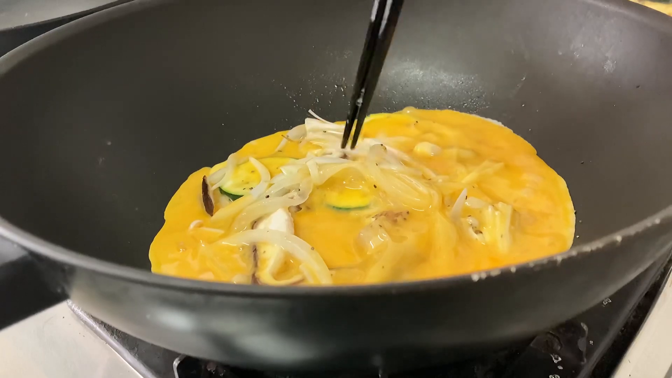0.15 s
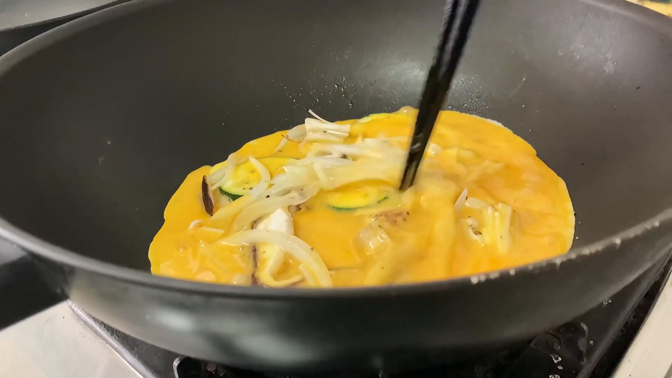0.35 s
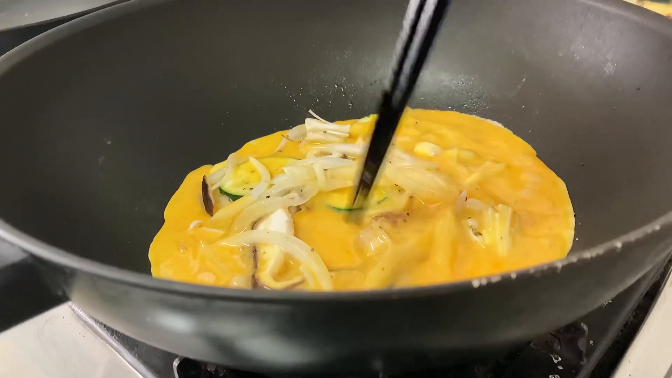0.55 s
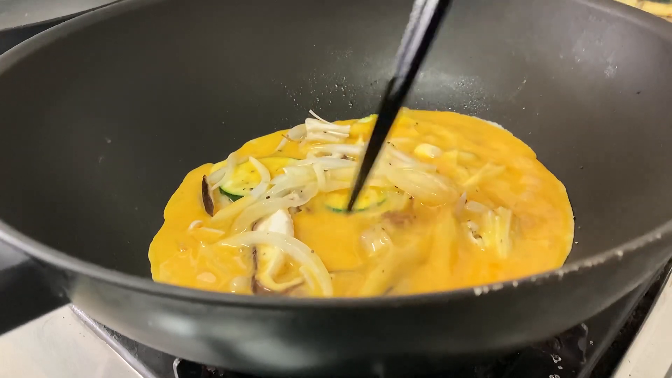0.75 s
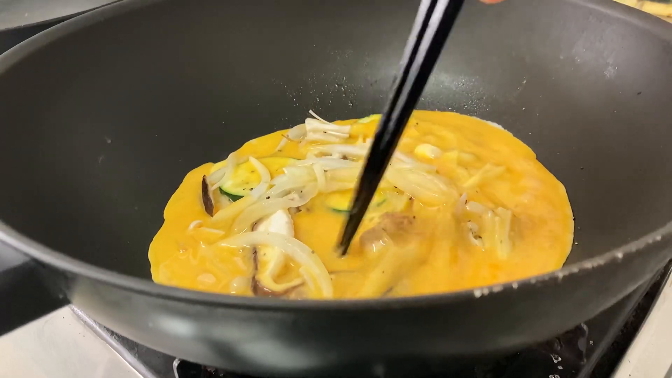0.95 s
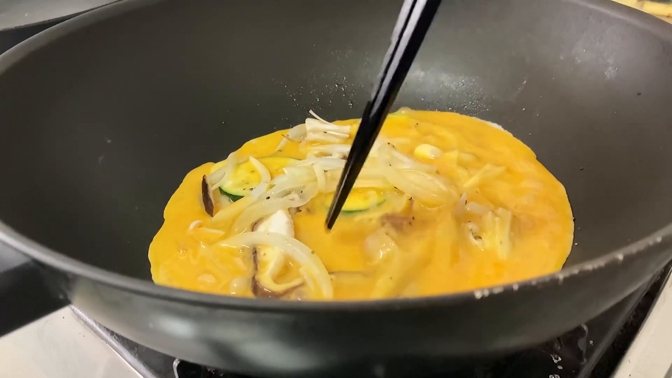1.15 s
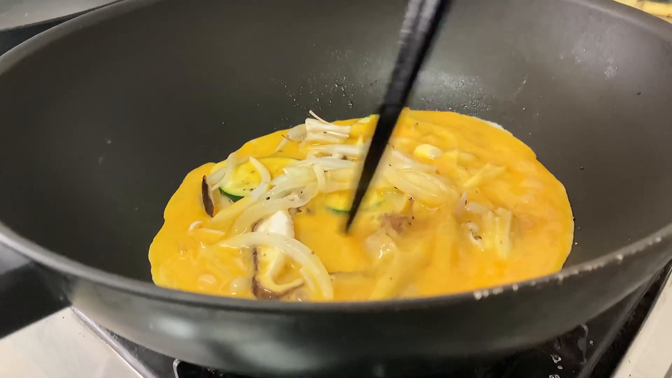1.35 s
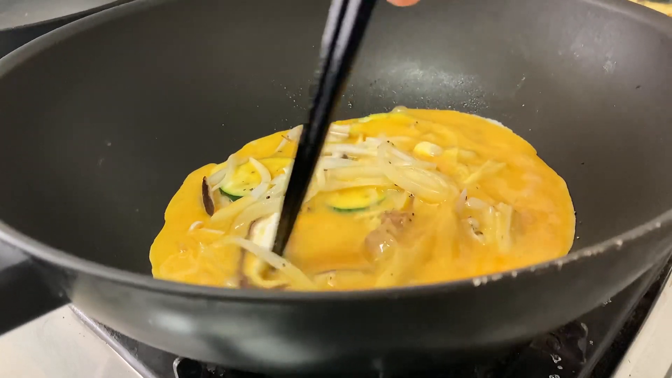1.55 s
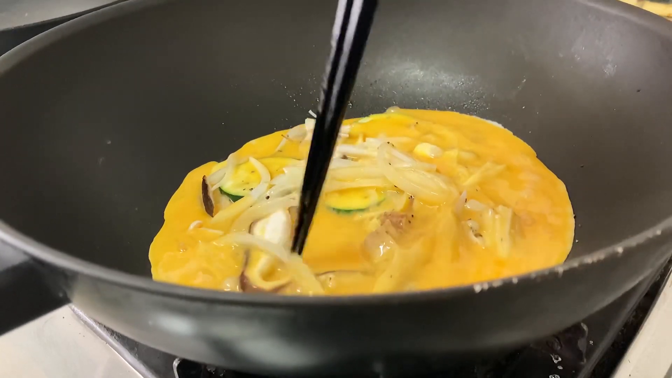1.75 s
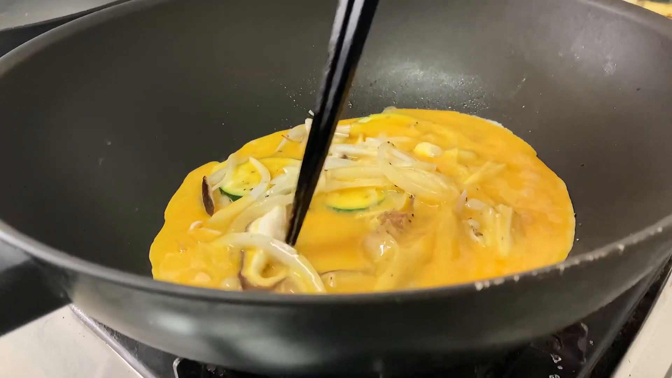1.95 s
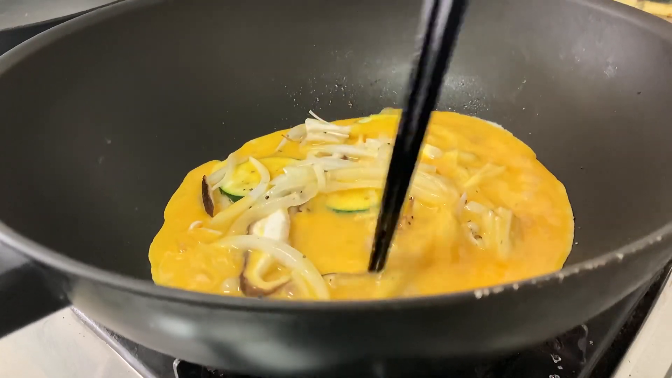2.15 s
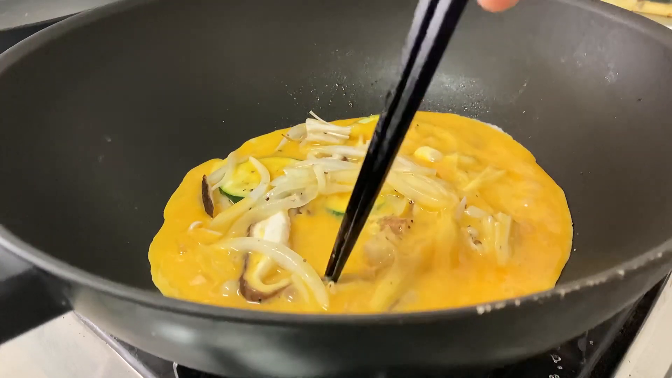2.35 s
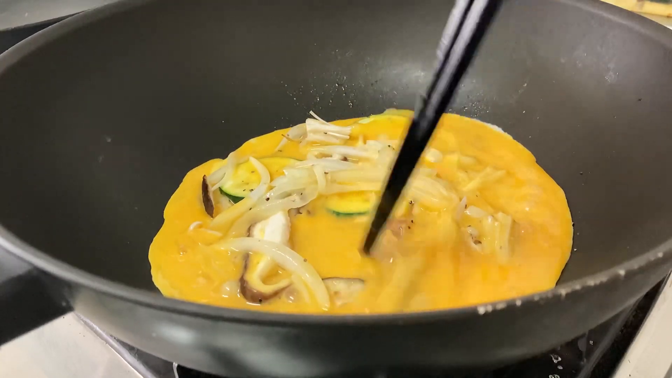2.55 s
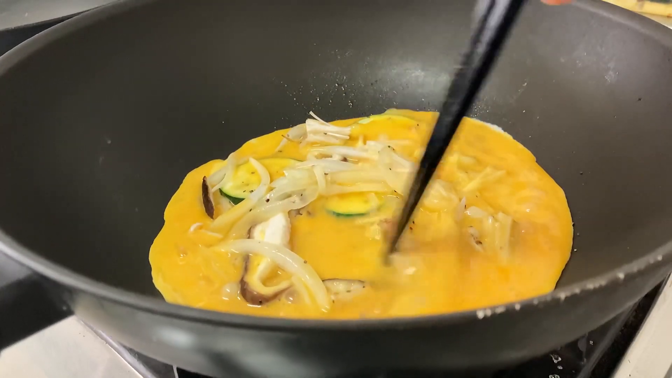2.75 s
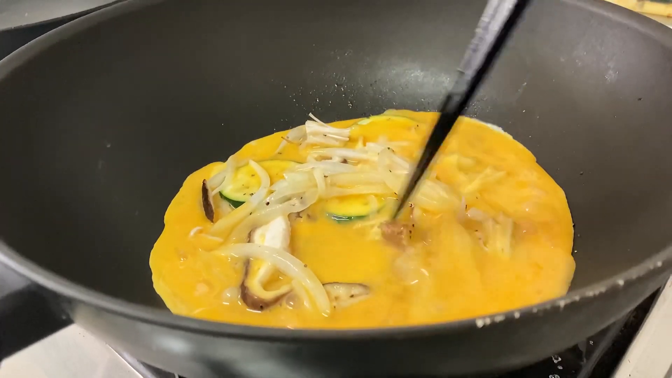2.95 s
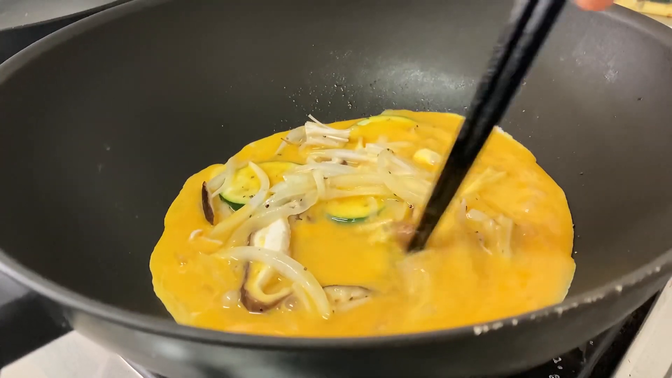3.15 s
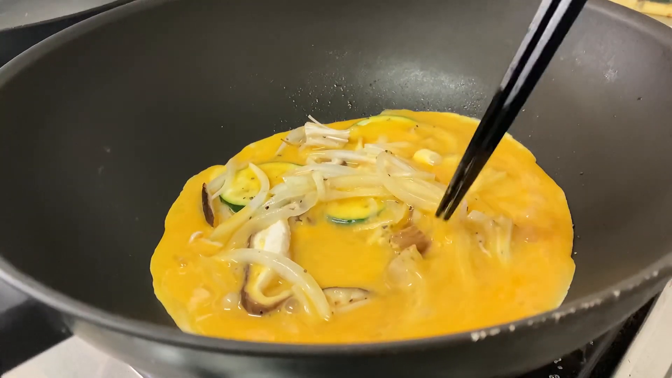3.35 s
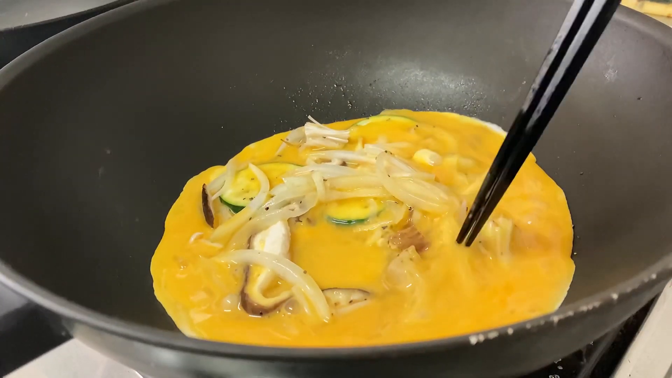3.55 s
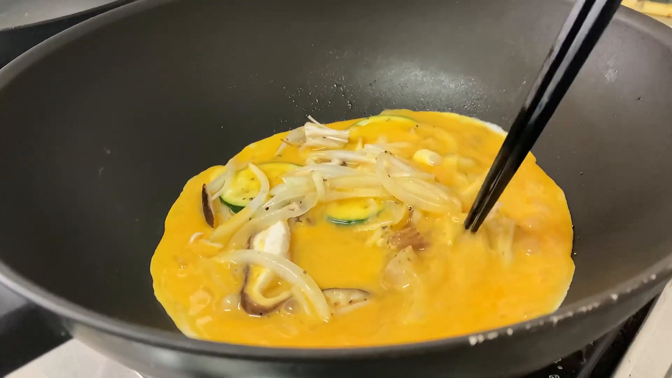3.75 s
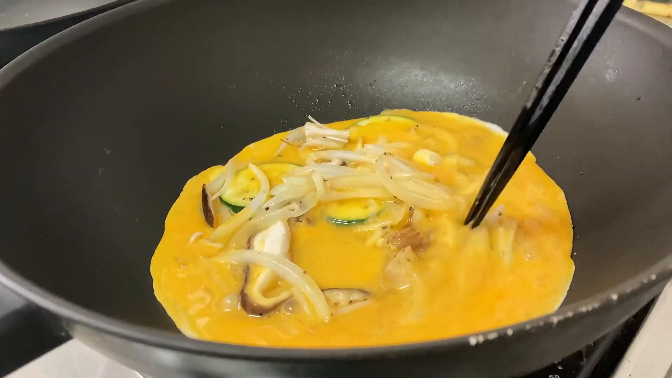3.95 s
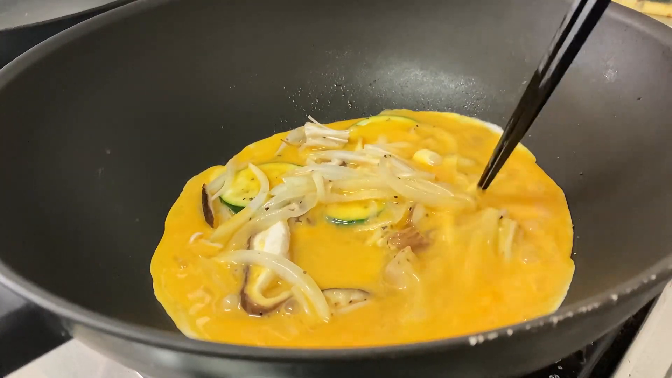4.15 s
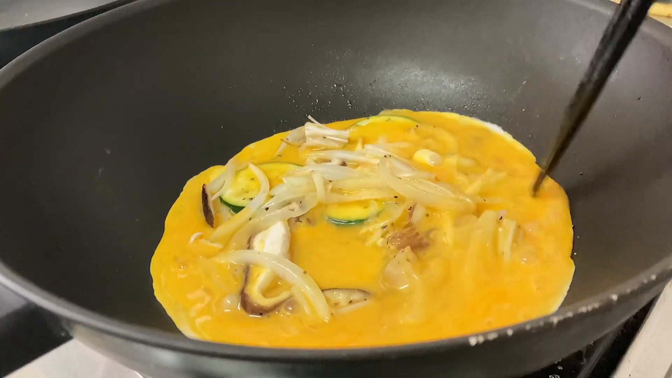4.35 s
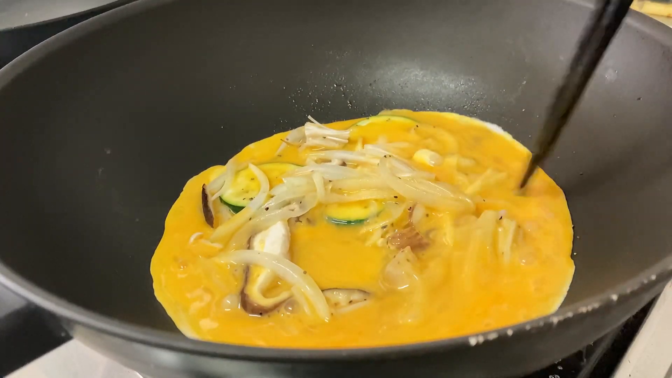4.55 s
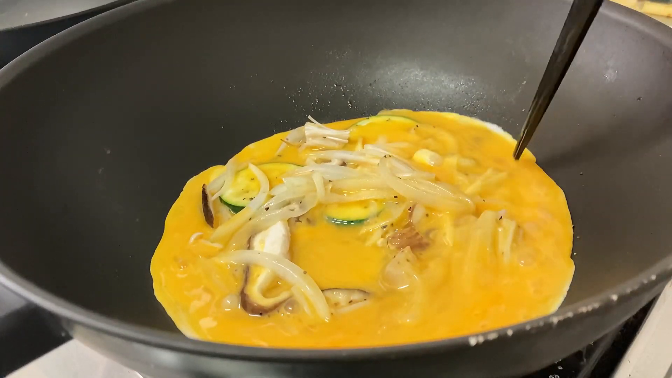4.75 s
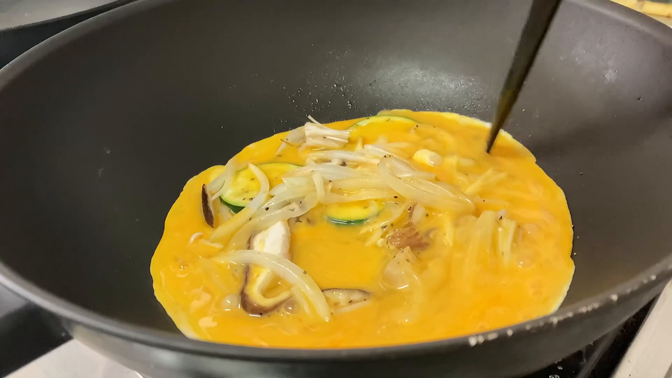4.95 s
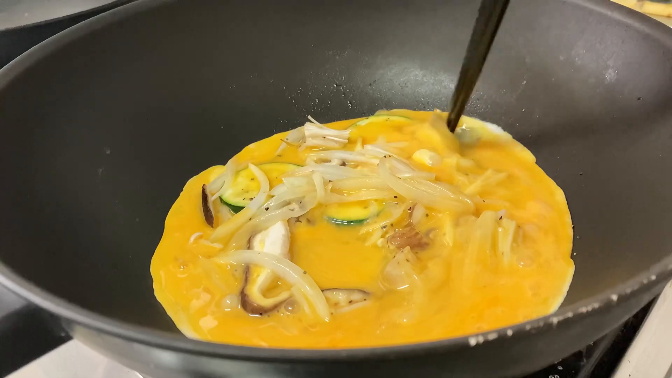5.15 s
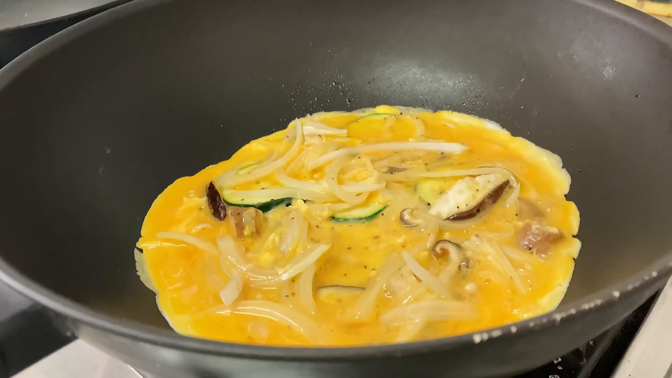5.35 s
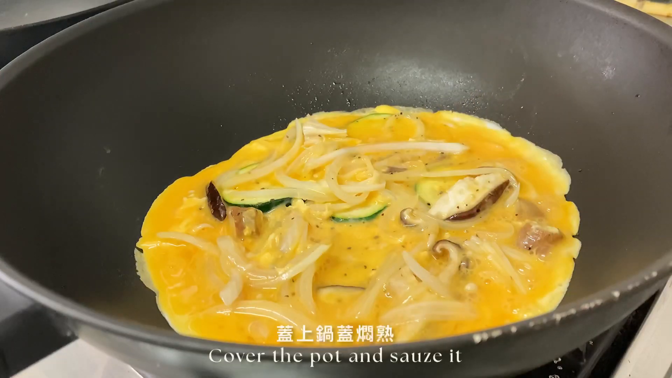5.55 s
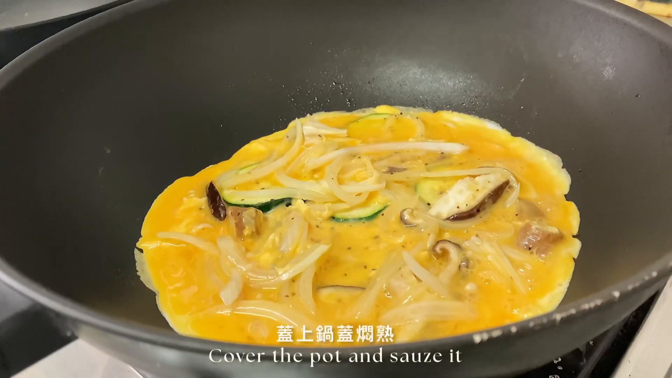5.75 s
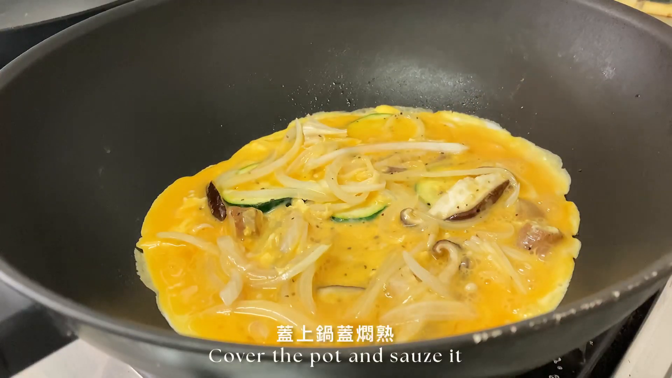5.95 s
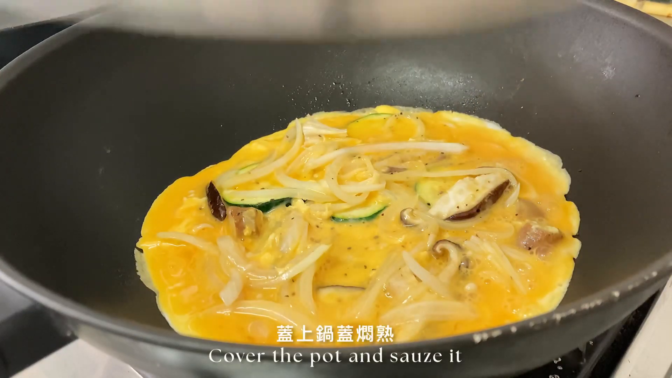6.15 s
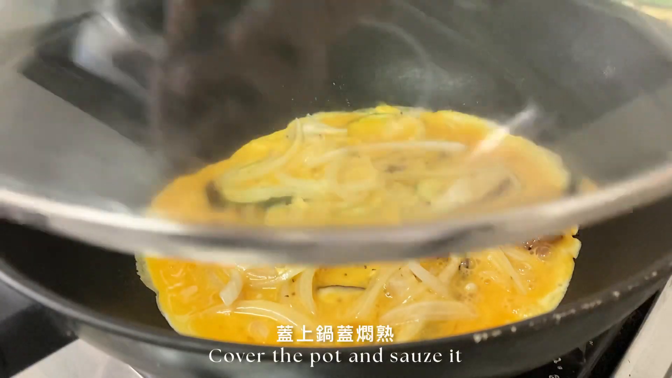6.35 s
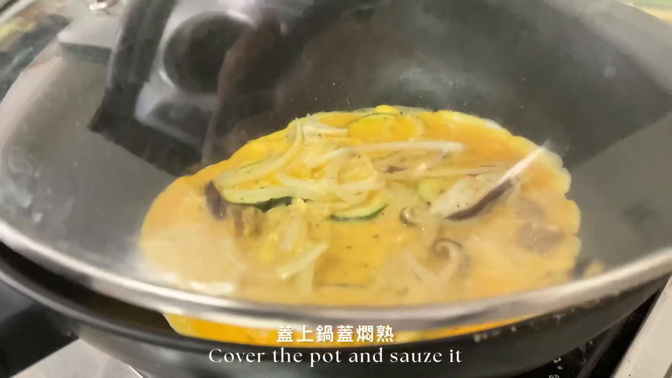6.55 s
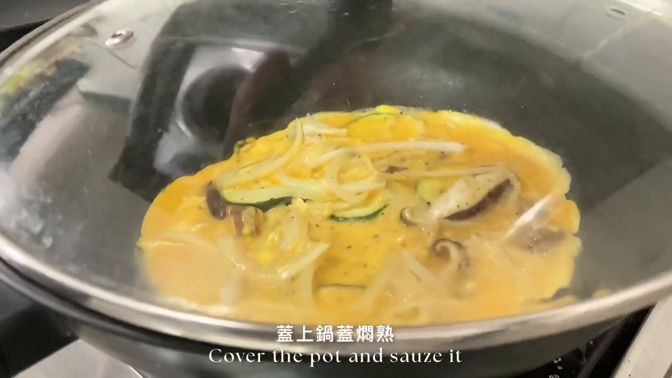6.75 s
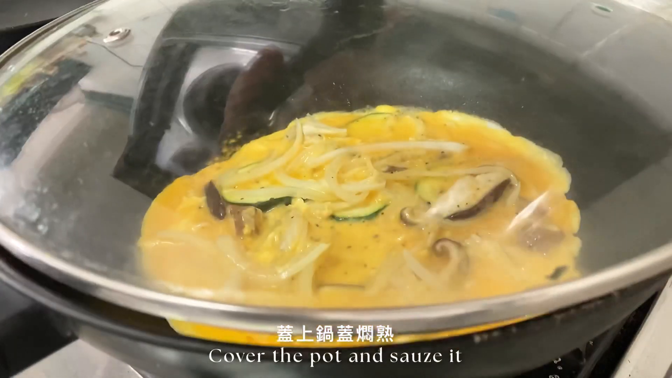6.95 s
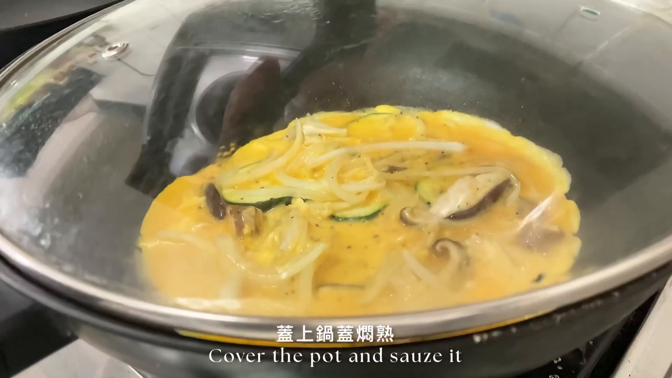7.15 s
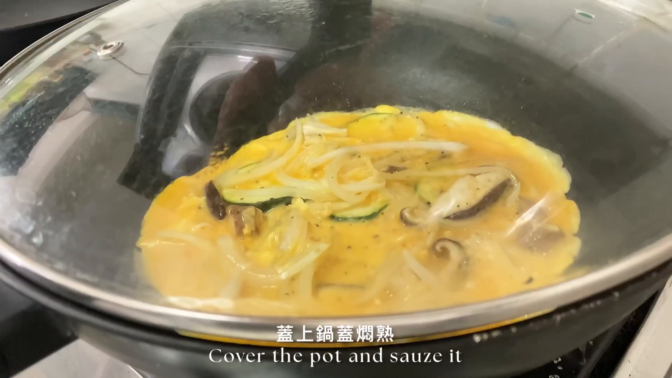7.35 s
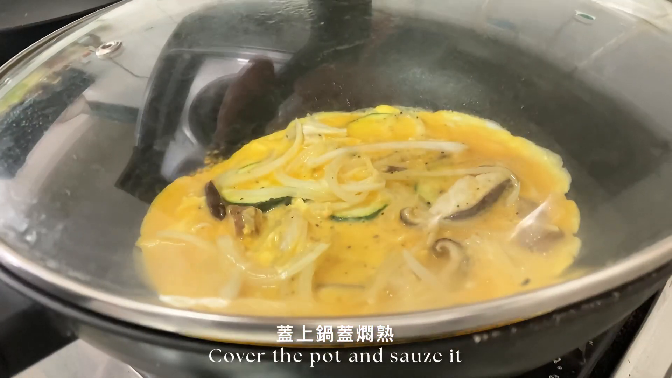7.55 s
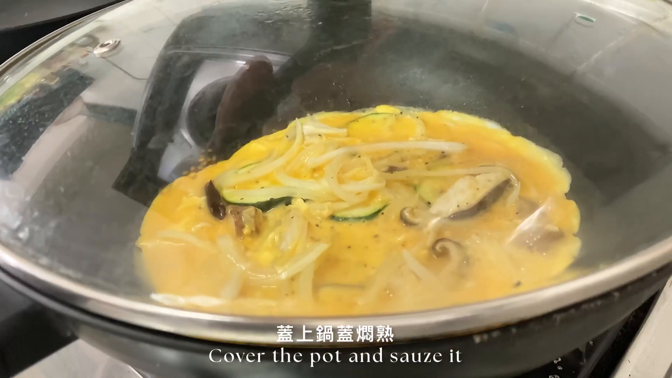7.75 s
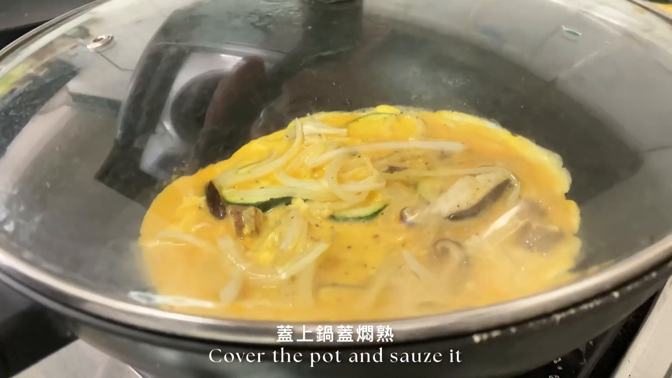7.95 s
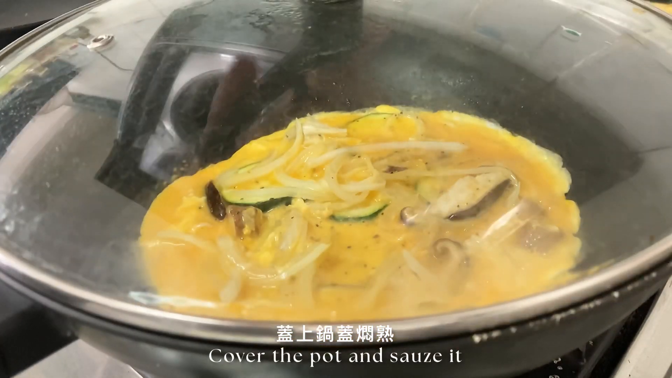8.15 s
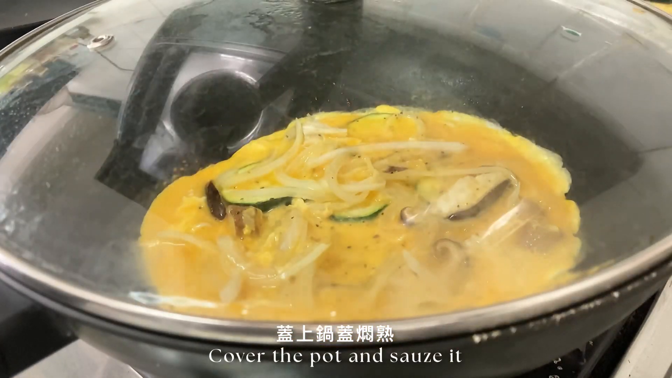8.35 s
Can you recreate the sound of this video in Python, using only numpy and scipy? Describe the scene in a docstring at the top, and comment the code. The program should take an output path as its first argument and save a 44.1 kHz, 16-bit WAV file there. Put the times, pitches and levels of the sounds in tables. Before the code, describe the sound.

Close in a small kitchen, egg and vegetables fry gently: fine fizz, bubbly simmer, wet pops and sharp little fat spits, over a low stove rumble. Chopsticks cause a few dull bumps. Just past five seconds the sizzle dips suddenly and becomes very faint. Then a glass lid with a metal rim knocks loudly, rattles and rocks, and finally drops shut with a ringing clack. Phone microphone, near the pan.

```python
"""Egg and vegetables sizzle gently in a pan: fizz and simmer are shaped noise, with ringing bubbles and spitting fat.
The level dips briefly and a fainter sizzle follows; then a glass lid knocks, rocks on the rim and drops shut,
each contact ringing a set of modes. A faint thin tone starts before the lid knocks and lasts to the end.
The pan shudders after the blows; poking with chopsticks gives dull bumps. Below lie a murmur of the pan and a
rumbling stove; a small kitchen echoes. It is heard close by, through a phone."""
import sys
import numpy as np
from scipy import signal
from scipy.fft import rfft, irfft, next_fast_len
from scipy.io import wavfile
from scipy.ndimage import uniform_filter1d, map_coordinates

SR = 44100
rng = np.random.default_rng(int(sys.argv[2]) if len(sys.argv) > 2 else 0)


def wav_out(sig):
    """Save sig, one row per channel (or a flat mono array), as 16-bit PCM at SR to the path in sys.argv[1]."""
    wavfile.write(sys.argv[1], SR, np.round(np.clip(np.atleast_2d(sig).T, -1, 1) * 32767).astype(np.int16))


N = 374409
DIP_S = 5.234  # the level dips here; the sizzle is fainter afterwards

# how hard the food fries, before the brief dip: t/s, fizz level/dB, simmer level/dB
FRYING = [(0, -53.5, -57), (.62, -53, -58.5), (1.25, -55.5, -60.5), (1.8, -57, -61), (2.5, -57.5, -61),
          (3.1, -56.5, -59), (4.0, -57, -61.5), (5.0, -56.5, -61), (5.1, -58, -58.5), (5.233, -55.5, -58),
          (5.24, -61, -57), (5.275, -64, -54), (5.31, -65, -59.5), (5.36, -66, -63), (5.42, -74.5, -66.5),
          (5.53, -76.5, -74.5), (5.79, -73, -70), (6.04, -76, -75.5), (6.27, -72.5, -75.5),
          (6.44, -78, -79.5), (7.0, -78, -78), (7.41, -82, -83), (7.51, -84, -88), (7.54, -78, -78),
          (7.62, -74, -76), (7.7, -82, -80.5), (7.83, -81.5, -80.5), (7.85, -69, -73), (8.49, -85.5, -85)]
# colour of the steam bubbling under the egg: f/Hz, relative level/dB
SIMMER_COLOUR = [(500, -29), (800, -19.5), (1020, 1.5), (1130, -4.5), (1260, 1.5), (1450, -5), (1900, -2.5),
                 (2300, -5.5), (2700, -5.5), (3200, -11), (3600, -7), (6000, -23.5)]
# colour of the fizz until the dip: f/Hz, relative level/dB
EARLY_FIZZ_COLOUR = [(1500, -21), (3000, -9), (3300, -15), (3650, -6.5), (4000, -10), (4400, -2.5),
                     (5500, -0.5), (6100, 1), (6600, 0.5), (7000, 3.5), (7350, 3), (8000, 2), (9500, 5),
                     (11500, -0.5), (13500, -2), (15600, -4.5)]
# colour of the fizz from the dip on: f/Hz, relative level/dB
LATE_FIZZ_COLOUR = [(1500, -41.5), (3000, -2.5), (4400, 0), (7000, -1), (9500, 1), (11500, -7),
                    (13500, -6.5), (15600, -14)]


def sizzle():
    """Steam bubbles under the egg, and water boiling off in the fat makes a fine fizz: both are patchy noise."""
    fizz_db, simmer_db = curves(FRYING)
    simmer_gain = amp(simmer_db + 1.7 * wobble(45))
    simmer = simmer_gain * rush(SIMMER_COLOUR, grainy=0.19, per_second=270, spread_db=2.5)
    early = rush(EARLY_FIZZ_COLOUR, grainy=0.2, per_second=900, spread_db=5.0)
    late = rush(LATE_FIZZ_COLOUR, grainy=0.15, per_second=530, spread_db=2.0)
    fizz_gain = amp(fizz_db + 0.34 * wobble(40) + 0.43 * wobble(14))
    fizz = fizz_gain * np.where(after_dip(1) > 0, late, early)
    return patchy(simmer, depth_db=1.5) + patchy(fizz, depth_db=2.0)


# the clearest steam bubbles bursting in the egg: t/s, starting level/dB of the lowest tone, its pitch f/Hz
CLEAR_POPS = [(0.3287, -52, 1010), (0.6392, -44, 1310), (0.9226, -47, 1310), (1.1634, -42.5, 1620),
              (1.46, -46, 1030), (2.017, -41.5, 1240), (2.2178, -49, 1300), (2.3673, -42.5, 2180),
              (2.6943, -43.5, 1240), (2.6935, -38, 1760), (2.571, -48, 2120), (2.762, -48, 1290),
              (2.976, -46, 1300), (3.284, -45, 2200), (2.8653, -48, 982), (2.9876, -46, 2120),
              (3.0649, -54, 1060), (3.235, -50, 1200), (3.5214, -46, 2700), (3.6681, -48, 2160),
              (4.3395, -49, 1260), (4.8404, -75, 1930), (0.7746, -48, 1270), (0.02, -46, 1200),
              (0.345, -47, 1250), (0.68, -49, 1150), (0.947, -54, 1010), (1.492, -54, 1050),
              (1.7429, -46, 1280), (1.9599, -50, 1250), (2.6349, -59, 1060), (3.0124, -44.5, 1250),
              (3.1541, -44, 2570), (3.1965, -43, 1640), (3.2546, -47, 2150), (3.2735, -48, 1230),
              (4.083, -46, 2950), (4.9706, -40, 1600), (0.426, -47, 1500), (1.228, -47, 1150),
              (1.335, -53, 1200)]
SMALL_POPS_PER_S, SMALL_POP_DB, SMALL_POP_HZ = 34, -56, 1400  # rate, mean level, middle pitch
POP_CYCLES = 17  # cycles of the lowest tone while it falls by 60 dB
TEAR_GAIN = 0.632  # of the smoothed noise, against the lowest tone


def pops():
    """Each bubble rings a few cycles with weaker overtones, and its skin tears with a wet click, across the pan."""
    s, (size, pitch, _) = scattered(SMALL_POPS_PER_S, count=320)
    small = np.transpose([s, SMALL_POP_DB + 4.8 * size, SMALL_POP_HZ * np.exp(0.3 * pitch)])
    s, db, hz = np.vstack([CLEAR_POPS, small]).T[:, :, None]
    turns = hz * np.arange(SR // 50) / SR  # cycles since the start
    tones = np.sin(2 * np.pi * turns)
    tones += 0.51 * np.sin(2 * np.pi * 1.805 * turns)
    tones += 0.5 * amp(-9 * turns) * np.sin(2 * np.pi * 2.8 * turns)
    ring = amp(db - 60 * turns / POP_CYCLES) * tones
    tear = uniform_filter1d(rng.standard_normal(turns.shape), size=7, axis=1) * amp(-14 * turns)
    pop = ring + amp(db) * TEAR_GAIN * tear
    pan_db = 0.99 + 3 * rng.standard_normal(s.shape)  # left over right
    return np.array([placed(s[:, 0], amp(side * pan_db / 2) * pop) for side in (1, -1)])


# chosen spits and small ticks: t/s, peak level/dB of the thin snap, body level/dB against that snap
CHOSEN_SPITS = [(0.1491, -33, -13), (0.1745, -30.5, -23), (0.4259, -37, 3), (0.5544, -37, -9),
                (0.9223, -35, -1), (1.076, -31, -1), (1.2296, -38, 3), (1.7484, -34, -6), (1.8472, -37, -3),
                (1.8956, -30.5, -15), (2.2792, -36.5, -6), (2.6783, -32.5, -7), (2.7526, -34, -6),
                (2.8943, -39, -5), (3.0784, -38, -5), (3.1522, -38.5, 12.5), (3.1757, -40, -12),
                (3.5458, -36, -1), (3.7274, -40, -6), (3.8227, -40, -5), (4.6229, -37.5, -16),
                (5.2314, -44, 2), (6.1764, -61.5, 16), (7.3013, -51, -11), (7.5228, -52, -10),
                (7.5887, -50, -10), (7.657, -52, 3.5), (7.783, -59, -11)]
SMALL_SPITS_PER_S, SMALL_SPIT_DB, SMALL_BODY_DB = 10, -49.5, -2.5  # rate and the two mean levels


def spits():
    """Each spit of fat or tick is a very short snap of noise through broad resonances, thin or with some body."""
    s, (size, fullness, _) = scattered(SMALL_SPITS_PER_S, count=120)
    small = np.transpose([s, SMALL_SPIT_DB + 4 * size, SMALL_BODY_DB + 3 * fullness])
    s, db, body_db = np.vstack([CHOSEN_SPITS, small]).T[:, :, None]
    t = np.arange(1024) / SR
    hz = np.fft.rfftfreq(len(t), 1 / SR)
    snap = rfft(rng.standard_normal((len(s), len(t))) * amp(-60 * t / 0.009))
    bright = resonances([(9900, 7300, 0)], hz) * resonances([(10900, 20000, 0)], hz)
    thin = peak_one(irfft(snap * bright))
    body_hz = 3500 * np.exp(0.22 * rng.standard_normal(s.shape))
    body = peak_one(irfft(snap * resonances([(body_hz, 1.9 * body_hz, 0)], hz)))
    return placed(s[:, 0], amp(db) * (thin + amp(body_db) * body))


# lid touching rim: t/s, push level/dB into the thud, knock, clack and tick modes,
# rattle time/s to fall by 60 dB, favoured knock f/Hz, favoured clack f/Hz
LID_CONTACTS = [(6.598, -3, 12, -18.5, -23.5, 0.041, 427, 1524),
                (6.607, 23.5, 38, 10, -6, 0.052, 442, 2220), (6.624, 20, 11, 0, -24.5, 0.1, 416, 1505),
                (6.641, -7, 0, 5, -18, 0.09, 418, 2125), (6.693, 10, 11, 2, -21.5, .085, 420, 2080),
                (6.775, -11, 22, -2, -56, 0.019, 710, 1080), (6.782, 10.5, 22, 9, -29, 0.087, 395, 2300),
                (6.793, -1, 7, -14, -20, 0.043, 420, 1800), (6.836, 2, 4, -9, -35, .046, 420, 1900),
                (6.897, -5, 11, -18, -29, 0.097, 417, 1950), (6.923, -6, 19, -16, -30, .049, 400, 2400),
                (6.932, 14, 19.5, -16, -26, 0.096, 414, 1000), (6.943, -7, -5, -8.5, -34, 0.026, 420, 2380),
                (6.979, -3, 24, -14, -37, 0.044, 320, 1000), (7.003, 10, -7, -15.5, -45, .05, 320, 2100),
                (7.051, 0, -13, -36, -62, 0.024, 395, 2050), (7.094, 0, -14.5, -49, -33.5, .02, 297, 3470),
                (7.19, 23.5, 14.5, -7.5, -46, 0.05, 561, 1010),
                (7.194, -7.5, -7, -17, -58, 0.026, 560, 1900), (7.209, 21, -21, -16, -50, .034, 300, 1900),
                (7.288, 7, -11, -40, -43.5, .06, 380, 2260), (7.345, -7, -19, -35, -44, .03, 300, 1260),
                (7.569, -12.5, -10.5, -33, -54.5, .08, 422, 1260),
                (7.649, -14, -15, -18.5, -50.5, 0.022, 400, 1807),
                (7.846, -4.5, -16, -41.5, -36, .04, 400, 3010),
                (7.865, 9, -7, -35, -26.5, 0.025, 302.4, 3400), (7.876, 20, 7, 2, -29.5, 0.046, 500, 1442),
                (7.888, 35, 36.5, 23.5, 4.5, 0.023, 449, 2107),
                (7.896, 30, 10.5, 3, -12.5, 0.046, 650, 2890), (7.909, 23.5, 0, 8, -25.5, .08, 404, 3110),
                (7.926, 25, -6.5, 7.5, -29, 0.093, 299, 2400), (7.939, 15, 24.5, 7, -29, .04, 800, 1400),
                (7.987, 10.5, 3.5, -18, -35.5, .046, 400, 2100),
                (8.097, 3, -21, -17, -41, 0.085, 462, 1300)]
# ringing modes of lid and pan: f/Hz, width f/Hz, level/dB
LID_MODES = [(49, 19, -9), (81, 41, -6), (112, 33, -0.5), (155.2, 48, 5), (186.4, 61, 3.5), (317, 46, -8.5),
             (352, 40, -7.5), (411, 38.6, 2), (460, 246, -1), (477, 62, -4.5), (553, 28, -21),
             (670, 43, -5.5), (815, 38, -15.5), (973, 55, 5), (1230, 32, -2), (1456, 36, -8),
             (1505, 43, -3.5), (1690, 26, -16.5), (1844, 24, 2.5), (2000, 37, -10.5), (2305, 45, 4.5),
             (2520, 27, -10.5), (2700, 33, -12.5), (2885, 82, -11.5), (3160, 30, -11.5), (3475, 17, -0.5),
             (1900, 5500, -8), (3630, 50, 5.5), (3810, 43, 12), (4040, 30, 3.5), (4200, 22, 14),
             (4900, 40, -3.5), (5270, 55, 15.5), (5800, 60, 8.5), (6060, 50, -5), (5200, 4200, 6.5)]
# limits of the thud, knock, clack and tick groups: f/Hz
MODE_GROUP_LIMITS = [0, 280, 900, 3500, 20000]
# knock, then clack: reach of the favoured pitch as a share of it, gain far from it
PITCH_FAVOUR = [(.4, 0.25), (.5, 0.46)]
RATTLE_RISE_S = 0.0012
BLOW_LAG_S = 0.001038  # the full weight lands just after the edge first touches
MODE_DRIFT = 0.0021  # chance in the pitch of each clear ring, as a share
RING_RATTLE_SHARE = 0.45  # the clear rings follow mostly the blow
LATE_CONTACT_S, LATE_RING_DB = 7.88, -4  # level of the clear rings for contacts after this time


def lid():
    """A blow and a short rattle drive the same modes at every contact; where it lands favours some of them."""
    out, t = np.zeros(N + SR), np.arange(2 ** 14) / SR
    hz = np.fft.rfftfreq(len(t), 1 / SR)
    modes = np.array(LID_MODES, dtype=float)
    centre_hz, width_hz = modes[:, 0], modes[:, 1]
    group = np.digitize(centre_hz, MODE_GROUP_LIMITS) - 1
    clear = (centre_hz > MODE_GROUP_LIMITS[2]) & (width_hz < centre_hz / 10)  # the narrow high rings
    # the low modes follow the blow, the broad high ones the rattle
    rattle_share = np.array([[0.12], [0.25], [0.8], [0.85]])
    # a padded contact passes little above the modes that it drives
    soft_hz = np.array([[600], [1800], [6000], [9500]])
    edges = (1j * hz / (25 + 1j * hz)) ** 2 / (1 + 1j * hz / soft_hz) ** 4
    blow = rfft(np.arange(len(t)) == round(BLOW_LAG_S * SR))

    def push(share, rattle):
        return share * rattle + (1 - share) * blow

    def answer(tuned, chosen):
        return np.array([resonances(tuned[chosen & (group == k)], hz) + 0 * hz for k in range(4)])

    for s, thud_db, knock_db, clack_db, tick_db, t60, knock_hz, clack_hz in LID_CONTACTS:
        rattle = rng.standard_normal(len(t)) * amp(-60 * t / t60) * (1 - np.exp(-t / RATTLE_RISE_S))
        rattle = rfft(rattle / np.linalg.norm(rattle))
        tuned = modes.copy()
        tuned[:, 0] *= 1 + MODE_DRIFT * clear * rng.standard_normal(len(modes))
        body = push(rattle_share, rattle) * answer(tuned, ~clear)
        ring_gain = amp(LATE_RING_DB * (s > LATE_CONTACT_S))
        body = body + ring_gain * push(RING_RATTLE_SHARE, rattle) * answer(tuned, clear)
        for k, favoured_hz, (reach, floor) in zip((1, 2), (knock_hz, clack_hz), PITCH_FAVOUR):
            body[k] *= floor + resonances([(favoured_hz, reach * favoured_hz, 0)], hz)
        sound = amp([[thud_db], [knock_db], [clack_db], [tick_db]]) * body * edges
        out[round(s * SR):][:len(t)] += irfft(sound.sum(axis=0))
    return out[:N]


# steel edge on steel rim: t/s, peak level/dB, centre f/Hz
RIM_CRACKS = [(6.6073, -22, 9050), (7.8882, -20, 4750)]
CRACK_T60_S = 0.02  # time for the noise to fall by 60 dB


def edge_cracks():
    """The two hard landings begin with a bright crack: a short noise burst through a broad resonance."""
    s, db, centre_hz = np.transpose(RIM_CRACKS)[:, :, None]
    t = np.arange(1024) / SR
    hz = np.fft.rfftfreq(len(t), 1 / SR)
    burst = rfft(rng.standard_normal((len(s), len(t))) * amp(-60 * t / CRACK_T60_S))
    crack = irfft(burst * resonances([(centre_hz, 1.1 * centre_hz, 0)], hz) ** 3)
    return placed(s[:, 0], amp(db) * peak_one(crack))


# the pan shudders on its stand after the lid strikes, levels before the soft rise and, for the ring,
# before its channels are averaged: t/s, broad noise level/dB, hollow ring level/dB, time/s to fall by 60 dB
PAN_SHUDDERS = [(6.62, -38, -37.5, 0.97), (6.77, -46, -43, 1), (6.93, -56, -47.5, 0.8),
                (7.2, -49, -68, 0.53), (7.941, -39.5, -49, 0.84), (8.1, -49, -49, 0.34)]
# colour of the broad noise: f/Hz, relative level/dB
SHUDDER_COLOUR = [(24, -46.5), (40, 2), (130, 1.5), (281, -2), (432, -22), (711, -11.5), (853, -16.5),
                  (1800, -28), (4360, -38.5), (7860, -37.5), (9000, -62.5), (11700, -100.5), (19800, -120)]
# colour of the air between lid and pan: f/Hz, relative level/dB
HOLLOW_COLOUR = [(250, -39.5), (320, 5), (360, 7.5), (390, 5), (415, 9.5), (480, 1), (540, -17.5),
                 (650, -19), (900, -41)]
SHUDDER_RISE_S = 0.029


def shudder():
    """The shaken pan gives rough noise and a hollow ring of air, which rise fast after a blow and die away."""
    s, noise_db, ring_db, t60 = np.transpose(PAN_SHUDDERS)[:, :, None]
    t = np.arange(SR // 2) / SR
    shape = amp(-60 * t / t60) * (1 - np.exp(-t / SHUDDER_RISE_S))

    def level(db):
        return np.sqrt(placed(s[:, 0], (amp(db) * shape) ** 2))  # overlapping shudders add as power

    noise = amp(1.6 * wobble(27)) * rush(SHUDDER_COLOUR, grainy=0.27, per_second=140, spread_db=1.5)
    ring = rush(HOLLOW_COLOUR).mean(axis=0)
    return level(noise_db) * leaning(noise) + level(ring_db) * ring


# dull bumps through the stove top, levels before the soft start:
# t/s, ring level/dB, ring f/Hz, thud level/dB, knock level/dB
STOVE_BUMPS = [(2.256, -60, 99, -76, -41.5), (2.376, -36.5, 180, -47, -47), (2.398, -33, 73, -61, -44),
               (2.431, -36, 92, -64, -49), (2.495, -39, 89, -55, -58), (3.536, -40, 178, -70, -42.5),
               (5.031, -58, 93, -57, -46), (6.159, -39, 97, -48, -52), (6.199, -40, 72, -55, -64.5)]
BUMP_T60_S, THUD_T60_S, KNOCK_T60_S = 0.088, 0.31, 0.07  # times to fall by 60 dB
THUD_HZ, KNOCK_HZ = 48, 403


def bumps():
    """Soft pushes: a short low ring, a deep thud of the counter and a knock of the pan, all dying sines."""
    s, db, hz, thud_db, knock_db = np.transpose(STOVE_BUMPS)[:, :, None]
    t = np.arange(SR // 3) / SR
    ring = amp(db - 60 * t / BUMP_T60_S) * np.sin(2 * np.pi * hz * t)
    thud = amp(thud_db - 60 * t / THUD_T60_S) * np.sin(2 * np.pi * THUD_HZ * t)
    knock = amp(knock_db - 60 * t / KNOCK_T60_S) * np.sin(2 * np.pi * KNOCK_HZ * t)
    soft_start = 1 - np.exp(-t / 0.0064)
    return placed(s[:, 0], (ring + thud + knock) * soft_start)


TONE_FROM_S, TONE_DB, TONE_FADE_DB_PER_S = 5.8, -90, 0.5


def thin_tone():
    """A faint, unsteady whistle: a narrow band of noise that fades slowly."""
    since = np.arange(N) / SR - TONE_FROM_S
    fade_in = np.clip(since / 0.092, 0, 1)
    level = amp(TONE_DB - TONE_FADE_DB_PER_S * since + 3 * wobble(7)) * fade_in
    return level * rush([(4000, -56.0), (4130, 0.0), (4210, -2.5), (4330, -64.5)])


# colour of the pan's murmur: f/Hz, relative level/dB
MURMUR_COLOUR = [(180, -22.5), (260, -9), (400, -3.5), (560, -8.5), (800, -12.5), (1400, -32.5),
                 (2500, -54.5)]
# shared by murmur() and stove(), before the brief dip: t/s, stove rumble level/dB, pan murmur level/dB
STOVE_LEVELS = [(0, -56.5, -61), (1.4, -58, -62.5), (1.8, -58, -64.5), (2.5, -54.5, -61.5),
                (3.0, -58.5, -64), (4.3, -60.5, -64), (4.65, -60.5, -61.5), (5.1, -56, -61),
                (5.3, -65.5, -64), (5.42, -63, -65), (5.55, -58.5, -67.5), (5.8, -56.5, -66),
                (6.15, -61, -69), (6.5, -57, -68), (7.4, -57, -70), (7.64, -56, -69.5), (7.85, -61.5, -72),
                (8.49, -65.5, -74)]


def murmur():
    """The bowl of the pan murmurs: low, slightly grainy noise of unsteady level."""
    gain = amp(curves(STOVE_LEVELS)[1] + 1.8 * wobble(20))
    return gain * rush(MURMUR_COLOUR, grainy=0.067, per_second=40, spread_db=2.0)


# colour of the rumble until the dip: f/Hz, relative level/dB
RUMBLE_EARLY_COLOUR = [(15, -49), (25, -38), (43, -11), (97, 3), (184, -6), (217, -9.5), (300, -17.5),
                       (390, -83), (660, -120)]
# colour it moves to from the dip on: f/Hz, relative level/dB
RUMBLE_LATE_COLOUR = [(15, -53.5), (25, -50), (38, -35), (62, -3.5), (74, 4), (79, 11), (85, -1),
                      (100, -5.5), (162, -12), (234, -12.5), (300, -28.5), (390, -41.5), (660, -120)]


def stove():
    """The stove is a lumpy low noise that changes colour over about half a second from the dip."""
    late = after_dip(0.57)
    drone = np.sqrt(1 - late) * rush(RUMBLE_EARLY_COLOUR) + np.sqrt(late) * rush(RUMBLE_LATE_COLOUR)
    return amp(curves(STOVE_LEVELS)[0] + 0.96 * wobble(14)) * leaning(drone)


# how long the room rings: f/Hz, time/s to fall by 60 dB
KITCHEN_T60 = [(100, 0.76), (300, 0.44), (1000, 0.46), (4000, 0.65), (6500, 0.26), (9000, 0.15),
               (14000, 0.2)]


def kitchen(x):
    """The room answers with a tail of noise in which each frequency dies at its own speed."""
    hz, t, z = signal.stft(rng.standard_normal((2, SR)), SR, nperseg=512)
    decay = amp(-60 * t / along(KITCHEN_T60, hz)[:, None])
    mid, side = signal.istft(z * decay, SR, nperseg=512)[1]
    tail = (mid + 0.58 * np.array([[1], [-1]]) * side) / np.linalg.norm(mid)
    delayed = np.pad(x, (300, 0))  # samples
    return signal.fftconvolve(delayed[None], tail, axes=1)[:, :N]


def amp(db):
    """Gain of a level in dB."""
    return 10 ** (np.asarray(db) / 20)


def unit(x):
    """x at rms 1."""
    return x / np.sqrt(np.mean(x ** 2) + 1e-20)


def peak_one(x):
    """Each row of x with its peak at 1."""
    return x / np.abs(x).max(axis=1, keepdims=True)


def along(points, hz):
    """Values read between (Hz, value) points on a log axis."""
    f, v = np.transpose(points)
    return np.interp(np.log(hz + 1), np.log(f + 1), v)


def curves(rows):
    """One value per sample for each column after the time."""
    s, *cols = np.transpose(rows)
    return [np.interp(np.arange(N) / SR, s, c) for c in cols]


def wobble(rate):
    """A smooth random curve, rate knots a second."""
    knots = rng.standard_normal(int(N * rate / SR) + 4)
    return map_coordinates(knots, [np.arange(N) * rate / SR])


def after_dip(fade_s):
    """0 until the level dips, then rising to 1 over fade_s seconds."""
    return np.clip((np.arange(N) / SR - DIP_S) / fade_s, 0, 1)


def scattered(per_second, count):
    """Random moments before the level dips, and three normal draws for each."""
    times = np.cumsum(rng.exponential(size=count)) / per_second
    draws = rng.standard_normal((count, 3))
    return times[times < DIP_S], draws[times < DIP_S].T


def placed(times, sounds):
    """Each row of sounds laid down at its time."""
    at = np.round(np.asarray(times) * SR).astype(int)[:, None] + np.arange(sounds.shape[1])
    return np.bincount(at.ravel(), sounds.ravel(), N + SR)[:N]


def filtered(x, response):
    """x times a complex response of frequency."""
    m = next_fast_len(N + 8192)
    return irfft(rfft(x, m) * response(np.fft.rfftfreq(m, 1 / SR)), m)[..., :N]


def resonances(modes, hz):
    """Answer of (Hz, width, dB) modes that ring only after the push, with alternating signs."""
    return sum((-1) ** k * amp(db) * 1j * hz * w / (c * c - hz * hz + 1j * hz * w)
               for k, (c, w, db) in enumerate(modes))


def grains(per_second, spread_db):
    """Two unrelated trains of tiny bursts at random moments, a few of them much stronger."""
    fires = rng.random((2, N)) < per_second / SR
    strength = amp(spread_db * np.minimum(rng.exponential(size=(2, N)), 3.5))
    return unit(fires * rng.standard_normal((2, N)) * strength)


# how alike left and right are in the noise: f/Hz, likeness (1 is the same, 0 unrelated)
LIKENESS = [(60, 0.91), (250, 0.9), (700, 0.53), (1300, 0.75), (2000, 0.95), (4000, 0.054), (6000, 0.58)]


def rush(spectrum, grainy=0, per_second=1000, spread_db=3):
    """Stereo noise of rms 1, part smooth and part grains; mixing two noises sets the left-right likeness."""
    share = np.clip(grainy, 0, 1)
    smooth = np.sqrt(1 - share) * rng.standard_normal((2, N))
    pair = smooth + np.sqrt(share) * grains(per_second, spread_db)

    def colour(hz):
        turn = np.arccos(np.clip(along(LIKENESS, hz), -1, 1)) / 2
        return amp(along(spectrum, hz)) * [np.cos(turn), np.sin(turn)]

    mid, side = filtered(pair, colour)
    return np.array([mid + side, mid - side]) / np.sqrt(np.mean(mid ** 2 + side ** 2))


def patches(hz_bins, frames):
    """A random field over frequency and time, smooth across a few bins and frames."""
    field = rng.standard_normal((129, N // 128 + 2))
    return unit(uniform_filter1d(uniform_filter1d(field, hz_bins, 0), frames, 1))


def patchy(x, depth_db):
    """x with spots of random gain, a few hundred Hz wide and some 30 ms long."""
    z = signal.stft(x, nperseg=256)[2]
    gain = amp(depth_db * patches(hz_bins=3, frames=10)[:, :z.shape[-1]])
    return signal.istft(z * gain, nperseg=256)[1][:, :N]


BASS_LEAN_DB = -1  # stove and stand, left over right


def leaning(x):
    """x a little nearer the right."""
    return x * amp([[BASS_LEAN_DB / 2], [-BASS_LEAN_DB / 2]])


DIP_GAIN, DIP_BACK_S = 0.18, 0.023  # gain at the bottom of the dip, time to fade back in


def scene():
    """Hits and crackle sound in the kitchen over steady layers, which drop at DIP_S and fade back in."""
    hits = lid() + edge_cracks() + bumps()
    crackle = pops() + spits()
    back = after_dip(DIP_BACK_S)
    dip = np.where(back > 0, DIP_GAIN + (1 - DIP_GAIN) * back, 1)
    steady = (sizzle() + murmur() + stove()) * dip
    room = amp(-15.5) * kitchen(hits) + amp(-13.0) * kitchen(crackle.mean(axis=0))
    return hits + crackle + room + steady + shudder() + thin_tone()


# left over right below the treble: f/Hz, level/dB
LEFT_TILT = [(60, -1), (130, -1.5), (290, 0.7), (640, 0.8), (1410, 1.8), (3100, 2.5), (6820, 0),
             (15000, 0.0)]
# how far left runs ahead of right: f/Hz, phase/radians
LEFT_LEAD = [(100, 0.041), (1200, 0.87), (1800, 1.44), (2400, 1.8), (3500, 1.63), (4800, 1.6), (6500, 2)]
SPREAD_FROM_HZ = 6200  # around here the one-signal treble takes over
IN_PHASE_HZ, TURN_HZ = 6950, 4420  # where both sides agree, and the span of one whole phase turn
SHELF_HZ, TOP_HZ = 15750, 16700  # treble low-pass: shelf and upper limit


def record(dry):
    """The phone leans its channels a little; its treble is one signal whose phase turns between left and right."""
    left = np.array([[1], [-1]])

    def step(hz, at_hz, width_hz):
        return np.clip((hz - at_hz) / width_hz + 0.5, 0, 1)

    def cross(hz):
        return step(hz, SPREAD_FROM_HZ, 960)

    def treble(hz):
        turn = 2 * np.pi * (hz - IN_PHASE_HZ) / TURN_HZ
        turn = turn - 0.64 * np.sin(2 * turn) / 2  # a bend that flattens the phase turn near 0 and pi
        top = amp(-24 * step(hz, SHELF_HZ, 100)) * (1 - step(hz, TOP_HZ, 300))
        return np.exp(-0.5j * left * turn) * cross(hz) * top

    def lower(hz):
        lead = np.exp(0.5j * left * along(LEFT_LEAD, hz))
        return amp(left * along(LEFT_TILT, hz) / 2) * lead * (1 - cross(hz))

    return filtered(dry, lower) + filtered(dry[0], treble)


dry = scene()
out = record(dry)
wav_out(out)
```